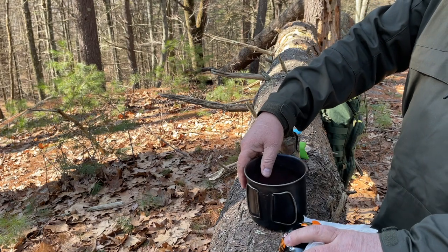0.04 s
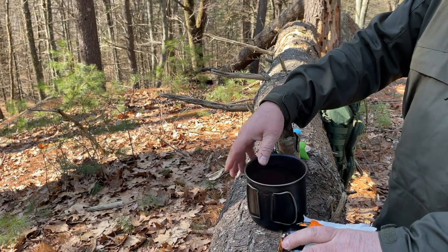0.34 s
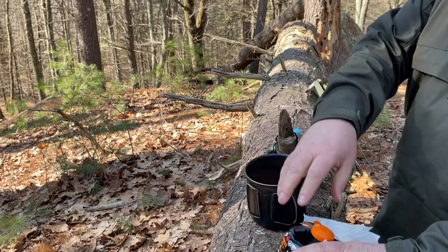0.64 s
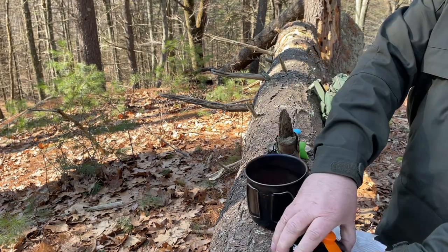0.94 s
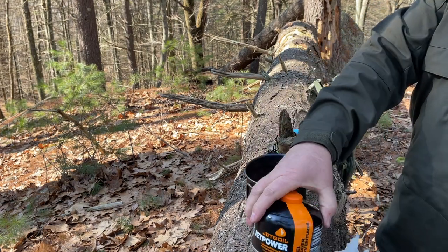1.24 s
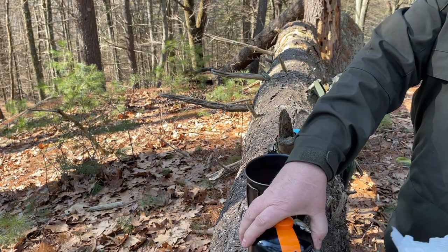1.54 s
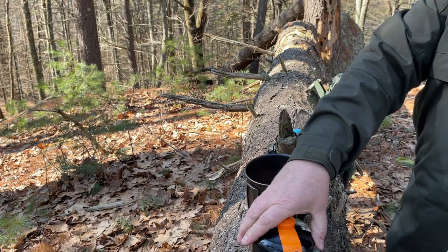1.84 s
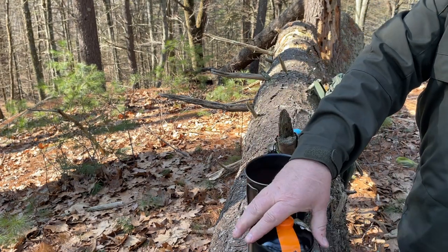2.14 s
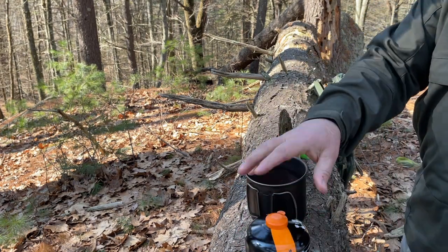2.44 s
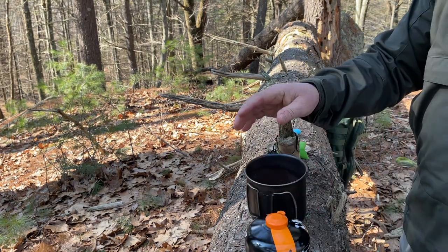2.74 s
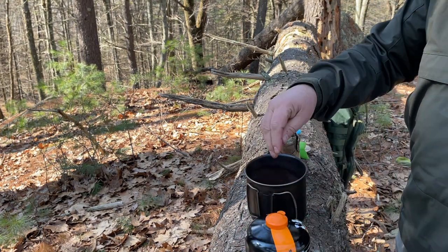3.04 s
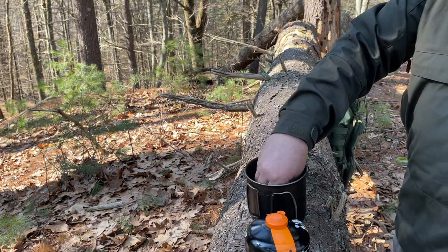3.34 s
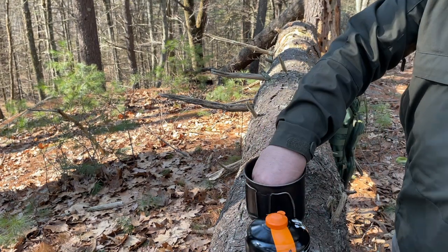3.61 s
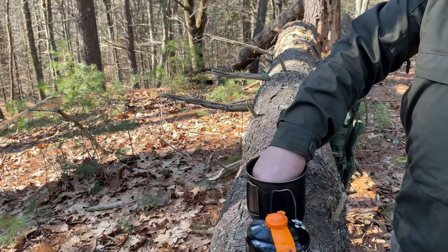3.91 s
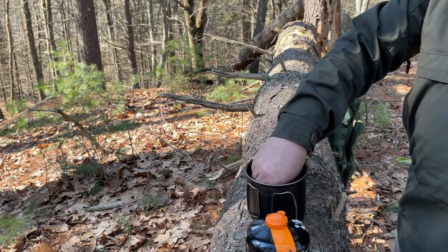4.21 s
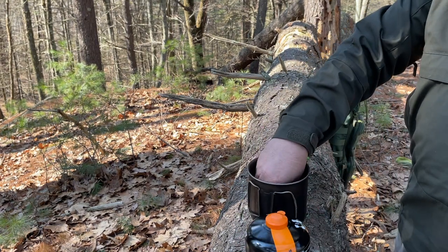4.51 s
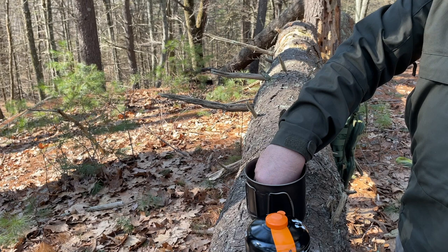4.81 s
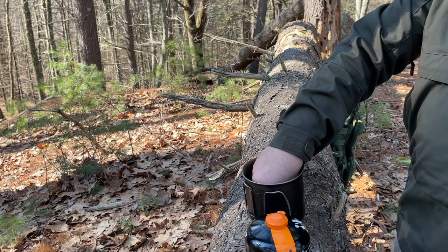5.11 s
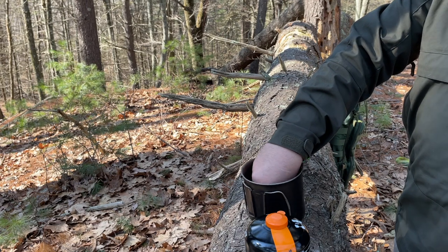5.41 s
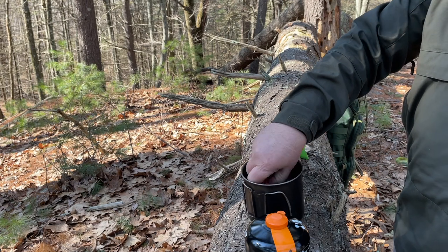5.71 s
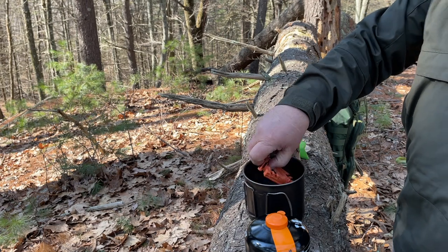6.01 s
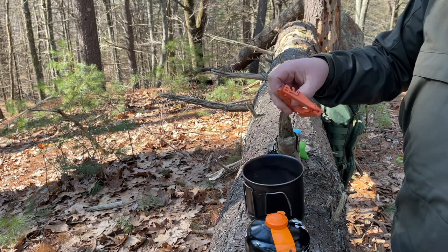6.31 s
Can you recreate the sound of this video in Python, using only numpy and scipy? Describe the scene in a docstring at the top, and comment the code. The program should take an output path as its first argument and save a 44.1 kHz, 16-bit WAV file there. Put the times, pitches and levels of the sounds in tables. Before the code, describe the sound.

Soft cloth rustling and a dull thud on wood, then knocks, a sharp metallic clatter inside a mug and light clinks, over faint forest hush.

```python
"""Metal gear clatters in a camp mug: each hit thumps the air inside and rings the thin wall and the gear.
Before that, in a quiet forest, a person in a stiff jacket sets a gas canister on a log with a dull boom.
The sleeve swishes as cloth rubs on cloth; fingers, plastic and bark make small dry ticks.
The hand reaches into the mug, where the gear scrapes, knocks and clatters until the grip stills it.
As the gear is lifted out, the mug's wire handles clink lightly."""
import sys
import numpy as np
from scipy import signal
from scipy.fft import rfft, irfft
from scipy.io import wavfile

SR = 44100
rng = np.random.default_rng(int(sys.argv[2]) if len(sys.argv) > 2 else 0)


def persist_wave(psi):
    """Save psi, clipped to +-1, as 16-bit WAV."""
    counts = np.round(np.clip(psi, -1, 1) * 32767).astype(np.int16)
    wavfile.write(sys.argv[1], SR, np.atleast_2d(counts).T)


N = 280247
TIME = np.arange(N) / SR
T = np.arange(SR) / SR  # one second for a sound to ring in

# tone colour of the forest air: f/Hz, level/dB
FOREST_SPECTRUM = [(15, -39.5), (25, -22), (33, -14), (82, 0), (134, -7.5), (206, -12.5), (293, -16.5),
                   (503, -18), (545, -24.5), (591, -18), (1400, -19), (1520, -17.5), (2220, -47.5),
                   (16000, -36)]
# tone colour of rubbing cloth: f/Hz, level/dB
CLOTH_SPECTRUM = [(71, -32), (120, 0), (147, -15), (188, -6), (393, -4.5), (427, -6), (630, -0.5),
                  (1940, -1), (4980, -5.5), (8140, -11), (12300, -11), (15000, -16.5), (16000, -22)]
# steady rubbing of the sleeve as the arm moves: t/s, level/dB
ARM_RUB = [(0.0, -75), (0.3, -76), (0.58, -66.5), (0.7, -59.5), (1.08, -58), (1.24, -61), (1.62, -58),
           (2.12, -54.5), (2.37, -61), (2.64, -60.5), (3.22, -57), (3.45, -50.5), (3.85, -56), (4.16, -59),
           (4.75, -70), (5.4, -67), (6.0, -77.5), (6.35, -67.5)]
# sleeve folds sweeping past the jacket: t/s, length/s, level/dB, extra treble/dB
SWISHES = [(0.334, 0.12, -64, -6.5), (0.755, 0.059, -72, 13.5), (0.83, 0.31, -66, 7),
           (1.018, 0.16, -53, -7.5), (1.666, 0.14, -52, -4.5), (1.808, 0.23, -54.5, -0.5),
           (2.06, 0.045, -54, -0.5), (2.209, 0.13, -55.5, -1.5), (2.367, 0.14, -62, 2),
           (2.679, 0.1, -59, -1), (2.85, 0.05, -51.5, -4.5), (3.013, 0.17, -55, -1),
           (3.265, 0.061, -48.5, -7.5), (3.321, 0.082, -47.5, -7.5), (3.87, 0.07, -59.5, -4.5),
           (3.994, 0.14, -51, -9.5), (5.564, 0.22, -75, 6)]
# ticks and squeaks: t/s, level/dB, centre/Hz, width/octaves, t60/s (the time to fade by 60 dB)
TICKS = [(0.019, -51, 1320, 0.79, 0.012), (0.412, -53.5, 1640, 0.3, 0.1), (0.535, -47, 1200, 0.63, 0.004),
         (0.759, -50, 2800, 2.2, 0.034), (1.150, -39.5, 2550, 1.2, 0.021), (1.430, -50.5, 1000, 1.4, 0.078),
         (1.4813, -36.5, 5400, 0.23, 0.013), (1.4805, -42.5, 10200, 0.41, 0.1),
         (1.483, -46.5, 800, 0.32, 0.055), (1.506, -43, 744, 0.3, 0.044),
         (1.667, -40.5, 2800, 0.54, 0.0099), (2.400, -35, 1460, 0.31, 0.011), (2.94, -47, 1990, 1.3, 0.022),
         (4.978, -40, 2630, 1.1, 0.015), (5.132, -58, 9500, 0.088, 0.029),
         (5.149, -52.5, 9750, 0.068, 0.051), (5.676, -51.5, 5200, 0.7, 0.045)]
# canister, hand and mug bumping the log: t/s, boom/dB, thud/dB, thud centre/Hz
THUMPS = [(0.776, -57, -75, 200), (1.063, -50.5, -42, 640), (1.483, -49, -41.5, 201),
          (1.505, -38, -33, 220), (2.238, -49, -44.5, 249), (2.256, -43, -69, 200), (3.387, -67, -38, 380),
          (4.426, -59, -51, 260), (4.465, -46, -49, 200), (4.519, -54, -40.5, 231)]
# the log's modes, the tones it rings at: f/Hz, level/dB, t60/s
LOG_MODES = [(118.7, 0, 0.39), (136, -5, 0.42), (189, -6, 0.2), (296, -11, 0.16)]
# fingers and gear sliding in the mug: t/s, length/s, hollow air/dB, metal/dB
SCRAPES = [(3.611, 0.036, -39, -60), (3.78, 0.037, -48, -55.5), (3.878, 0.026, -46, -57),
           (3.999, 0.14, -55.5, -72), (4.195, 0.14, -51, -46), (4.433, 0.091, -60, -37.5),
           (4.808, 0.05, -79, -67.5), (5.005, 0.1, -64, -61.5), (5.249, 0.061, -43.5, -47.5),
           (5.322, 0.051, -48, -73), (5.425, 0.032, -43.5, -57), (5.633, 0.15, -76, -83)]
# tones of the air in the half-covered mug: f/Hz, level/dB, t60/s
HOLLOW_MODES = [(519.2, -6, .09), (624, 0, 0.023), (774, -1, 0.018), (883, -3, 0.032), (1060, 1, 0.011),
                (2030, -1.5, 0.075), (2587, -17.5, 0.03)]
# tones of the metal gear, plus a low hum from the mug's base: f/Hz, level/dB, t60/s
GEAR_AND_BASE_MODES = [(300, -16.5, 0.47), (1712, -0.5, 0.15), (2454, 5, 0.19), (2770, -12, 0.082),
                       (2930, -1.5, 0.15), (3180, -15, .12), (3434, 2.5, 0.13), (3940, -3.5, 0.17),
                       (4280, -1, 0.16), (4510, -0.5, 0.18), (5240, -11, .13), (6030, -13.5, 0.08),
                       (6840, -14, 0.13), (8320, -11.5, 0.23)]
# tones of the mug's thin wall: f/Hz, level/dB, t60/s
WALL_MODES = [(1103, -7.5, 0.16), (1164, 0.5, 0.26), (1188, -3.5, 0.18), (1671, -9, 0.46),
              (1708, 0.5, 0.14), (2322, -8.5, 0.2), (2350, -11.5, 0.16), (2626, 5.5, 0.034),
              (2700, -10, 0.11), (3060, -21, .3), (3410, -7, 0.075), (3570, -24, 0.14),
              (4400, -11.5, 0.086), (4655, -14, 0.17), (5650, -9.5, .16), (5900, -14.5, 0.2),
              (6190, -22.5, 0.16), (7020, -12, 0.29), (7000, -12.5, 0.18), (8700, -16.5, .18),
              (9650, -3.5, 0.084), (11460, -25.5, .2), (11600, -25.5, .2), (12630, -19.5, .15),
              (13820, -14.5, .18), (14400, -24.5, .12)]
# gear hitting the mug: t/s, knock/dB, knock centre/Hz, wall/dB, gear and base/dB, clash/dB,
# top/Hz (high = hard)
STRIKES = [(3.622, -37, 760, -68, -64, -58, 3000), (3.950, -34.5, 810, -53, -59, -58, 3500),
           (4.2006, -16.5, 620, -44, -50.5, -31.5, 2340), (4.3314, -27.5, 740, -50.5, -35, -26.5, 15000),
           (4.369, -37, 846, -54, -39.5, -30.5, 11000), (4.428, -11, 666, -28, -54, -30, 4000),
           (4.451, -27.5, 1050, -33, -54.5, -38, 9000), (4.4605, -7.5, 1070, -24.5, -48, -29, 6000),
           (4.466, -32.5, 1020, -32, -41.5, -26.5, 16000), (4.505, -22.5, 600, -22.5, -54.5, -29, 15000),
           (4.520, -21.5, 880, -29, -60.5, -25.5, 16000), (4.535, -22, 602, -29.5, -48.5, -39.5, 12000),
           (5.264, -53, 810, -46.5, -72, -62, 4000), (5.274, -29.5, 870, -51, -51.5, -59, 4000),
           (5.290, -28.5, 730, -65, -81, -64, 4000), (5.423, -23.5, 619, -58, -78, -57.5, 7000)]
# the hand closing on the ringing metal: t/s, extra fading/(dB per s)
GRIP_DAMPING = [(4.5, 9.5), (4.535, 75), (4.55, 648), (4.575, 194.5), (4.61, 6.5)]
# light touches on the wire handles: t/s, ring/dB, clash/dB
CLINKS = [(5.431, -56.5, -57), (5.565, -62, -57), (5.638, -52.5, -53.5), (5.676, -53.5, -56)]
# tones of the emptied mug and its handles: f/Hz, level/dB, t60/s
HANDLE_MODES = [(597.6, -14, 1), (774, -17.5, 0.94), (1550, -11.5, 1.0), (1663, -13, 0.78),
                (1742, 2.5, 0.36), (1860, -5, 0.3), (2500, -11, 0.25), (3060, -15, 0.45),
                (3500, -5.5, 0.16), (4290, -4.5, 0.11), (5910, -10, 0.15), (8650, -15, 0.2)]
# how much louder the left side is than the right: f/Hz, level/dB
BALANCE = [(60, 3), (120, -0.5), (240, 0.0), (480, 1.5), (950, 0.5), (1890, -1.5), (3770, -0.5), (7520, 1),
           (15000, -0.5)]


def amp(db):
    """Turns decibels into a gain."""
    return 10 ** (np.asarray(db) / 20)


def unit_rms(x):
    """Scales a sound to an average power of 1."""
    return x / np.sqrt(np.mean(x ** 2) + 1e-20)


def level_at(points, hz):
    """Reads between the points of a spectrum, on a log-frequency axis."""
    f, value = np.transpose(points)
    return np.interp(np.log(hz + 1), np.log(f + 1), value)


def add(mix, s, sound):
    """Mixes a sound in, starting at s seconds."""
    part = mix[max(round(s * SR), 0):][:len(sound)]
    part += sound[:len(part)]


def hump(hz, centre_hz, octaves):
    """A bell curve that peaks at 1 on the centre frequency."""
    return np.exp(-.5 * (np.log2((hz + 1) / centre_hz) / octaves) ** 2)


def decay(t, t60):
    """A fade that drops 60 dB every t60 seconds."""
    return np.exp(-np.log(1000) * t / t60)


def noise(gain, size):
    """Noise of power 1, coloured by the curve gain(hz)."""
    hz = np.fft.rfftfreq(size, 1 / SR)
    return unit_rms(irfft(rfft(rng.standard_normal(size)) * gain(hz), size))


def highpass(x, hz):
    """Cuts the bass, as small objects give off little of it."""
    return signal.sosfilt(signal.butter(4, hz, "high", fs=SR, output="sos"), x)


def soften(x, hz):
    """Cuts the treble, as a soft contact has no sharp edge."""
    return signal.sosfilt(signal.butter(2, min(hz, .45 * SR), fs=SR, output="sos"), x)


def partials(modes, flip=False):
    """An object's frequencies and fading tones; flip starts neighbours opposite ways, as in a shell."""
    hz, db, t60 = np.transpose(modes)[:, :, None]
    sign = (-1. if flip else 1.) ** np.arange(len(hz))[:, None]
    return hz[:, 0], sign * amp(db) * decay(T, t60) * np.sin(2 * np.pi * hz * T)


def forest(level_db=-68.5):
    """Still air and far-off leaves make a soft, low hush."""
    return amp(level_db) * noise(lambda hz: amp(level_at(FOREST_SPECTRUM, hz)), N)


def fold_speed(length, swell_share=0.34, fade_share=0.24):
    """A sweeping fold of cloth speeds up, holds, then slows down."""
    progress = np.linspace(0, 1, int(length * SR))
    ramp = np.minimum(progress / swell_share, (1 - progress) / fade_share)
    return np.sin(np.pi / 2 * np.clip(ramp, 0, 1))


def sleeve(split_hz=3600, flutter_db=1.1, crease_db=-12, creases_per_s=500, usual_db=-58):
    """Cloth slides on cloth: a swish that flutters with the folds, with tiny creases snapping in it."""
    arm_db = np.interp(TIME, *np.transpose(ARM_RUB))
    fizz_db = arm_db - 5.5 + 0.11 * (arm_db - usual_db)  # faster rubbing is brighter
    body_power, fizz_power = amp(arm_db) ** 2, amp(fizz_db) ** 2
    for s, length, db, treble_db in SWISHES:
        add(body_power, s, (amp(db) * fold_speed(length)) ** 2)
        add(fizz_power, s, (amp(db + treble_db) * fold_speed(length)) ** 2)
    creases = (rng.random(N) < creases_per_s / SR) * rng.standard_normal(N)
    friction = rng.standard_normal(N) + amp(crease_db) * unit_rms(creases)
    flutter = amp(flutter_db * noise(lambda f: 1 / (1 + (f / 60) ** 2), N))
    hz = np.fft.rfftfreq(N, 1 / SR)
    cloth = rfft(friction * flutter) * amp(level_at(CLOTH_SPECTRUM, hz))
    treble_share = 1 / (1 + (split_hz / (hz + 1)) ** 2)
    body = np.sqrt(body_power) * unit_rms(irfft(cloth * (1 - treble_share), N))
    fizz = np.sqrt(fizz_power) * unit_rms(irfft(cloth * treble_share, N))
    return body + fizz


def ticks(rise_s=0.000067):
    """Fingers, plastic and bark touch in short, dry bursts that leave the mug silent."""
    out, t = np.zeros(N), T[:SR // 10]
    for s, db, centre_hz, octaves, t60 in TICKS:
        fade = decay(t, t60)
        tick = noise(lambda hz: hump(hz, centre_hz, octaves), len(t)) * fade * (1 - np.exp(-t / rise_s))
        add(out, s, amp(db) * tick * np.linalg.norm(fade) / np.linalg.norm(tick))
    return out


def log_thumps(thud_t60=0.068, rise_s=0.0029, right_lag_s=0.0009):
    """A dull thud on bark, and the log booming under it; the boom reaches the left ear first."""
    out = np.zeros((2, N))
    _, log_tones = partials(LOG_MODES)
    boom = log_tones.sum(0) * (1 - np.exp(-T / rise_s))
    fade = decay(T, thud_t60)
    for s, boom_db, thud_db, thud_hz in THUMPS:
        thud = highpass(noise(lambda hz: hump(hz, thud_hz, octaves=0.96), SR) * fade, hz=109)
        thud *= np.linalg.norm(fade) / np.linalg.norm(thud)
        for ear, lag in zip(out, (0, right_lag_s)):
            add(ear, s + lag, amp(boom_db) * boom)
            add(ear, s, amp(thud_db) * thud)
    return out


def hollow_knock(centre_hz, spread=1.38, overtones=.12):
    """A blunt push rings the air in the mug, mostly near centre_hz."""
    hz, tones = partials(HOLLOW_MODES)
    low_hz = max(centre_hz / spread, .95 * hz.min())
    high_hz = max(centre_hz * spread, 1.2 * low_hz)
    band = signal.butter(3, [low_hz, high_hz], "band", fs=SR, output="sos")
    ring = tones.sum(0)
    return signal.sosfilt(band, ring) + overtones * highpass(ring, hz=1600)


def clash(t60, top_hz, main_hz, cluster_hz=110, crack=1.0, crack_s=0.0023):
    """Metal on metal wakes a crowd of short tones, stronger near the main ones, weak above top_hz."""
    t, count = T[:SR // 5], 320
    hz = (np.linspace(500, 16000, count) + rng.uniform(-24, 24, count))[:, None]
    colour = amp(level_at([(500, -0.5), (900, 6.5), (1400, -2.5), (2700, -9), (4200, -0.5), (8000, -2),
                           (11000, -1.5), (14500, -1), (16000, -8)], hz))
    nearness = np.exp(-.5 * ((hz - main_hz) / cluster_hz) ** 2).max(1, keepdims=True)
    gains = colour * (0.92 + nearness) / np.sqrt(1 + (hz / top_hz) ** 4)
    fades = decay(t, t60 * (hz / 5000) ** -.35)  # high tones die sooner
    tones = fades * np.sin(2 * np.pi * (hz * t + rng.random(hz.shape)))
    bite = 0.73 + crack * np.exp(-t / crack_s)  # the first instant of contact is the hardest
    return bite * (gains * tones).sum(0) / np.sqrt(np.sum(gains ** 2) / 2)


def scrapes(slips_per_s=900, rasp=0.067):
    """Sliding is a run of tiny slips, each ringing the gear and the mug's air and base, with a rasp."""
    out = np.zeros(N)
    metal_hz, metal_tones = partials(GEAR_AND_BASE_MODES, flip=True)
    air = hollow_knock(centre_hz=706, spread=1.39, overtones=0.048)
    metal = (0.17 + hump(metal_hz, 2450, octaves=0.46)) @ metal_tones * np.exp(-T / 0.048)
    add(metal, 0, amp(5.0) * clash(t60=0.017, top_hz=16000, main_hz=metal_hz))
    air, metal = air / np.linalg.norm(air), metal / np.linalg.norm(metal)
    for s, length, hollow_db, metal_db in SCRAPES:
        size = int(length * SR)
        slips = rng.standard_normal(size) * (rasp + (rng.random(size) < slips_per_s / SR))
        slide = unit_rms(slips) * signal.windows.tukey(size, .5)
        add(out, s, signal.fftconvolve(slide, amp(hollow_db) * air + amp(metal_db) * metal))
    return out


def clatter(hard_hz=10000, wall_clash_t60=0.08, gear_clash_t60=0.17):
    """Each hit thumps the mug's air and rings wall, base and gear; the closing hand stills them."""
    out = np.zeros(N)
    wall_hz, wall_tones = partials(WALL_MODES, flip=True)
    gear_base_hz, gear_base_tones = partials(GEAR_AND_BASE_MODES, flip=True)
    damped_db = np.cumsum(np.interp(TIME, *np.transpose(GRIP_DAMPING))) / SR
    for s, knock_db, knock_hz, wall_db, gear_base_db, clash_db, top_hz in STRIKES:
        grip = amp(np.interp(s, TIME, damped_db) - np.interp(s + T, TIME, damped_db))
        hardness, edge_hz = top_hz / hard_hz, 2.6 * top_hz
        knock = soften(.5 * amp(knock_db) * hollow_knock(knock_hz), edge_hz)
        peak_hz = 2186 * hardness ** 0.17  # harder hits wake higher tones of the wall
        wall_gains = hump(wall_hz, peak_hz, octaves=0.88) + 0.21 * hump(wall_hz, peak_hz, octaves=1.9)
        ring = amp(wall_db) * wall_gains @ wall_tones + amp(gear_base_db) * gear_base_tones.sum(0)
        add(out, s, grip * (knock + ring))
        on_wall = wall_db > gear_base_db  # the piece hit harder colours the clash
        main_hz, t60 = (wall_hz, wall_clash_t60) if on_wall else (gear_base_hz, gear_clash_t60)
        metal = soften(clash(t60 * hardness ** 0.41, top_hz, main_hz), edge_hz)  # soft hits die sooner
        add(out, s, amp(clash_db) * metal * grip[:len(metal)])
    return out


def handle_clinks():
    """The wire handles ring on freely after light touches."""
    out = np.zeros(N)
    hz, tones = partials(HANDLE_MODES, flip=True)
    for s, ring_db, clash_db in CLINKS:
        add(out, s, amp(ring_db) * tones.sum(0))
        add(out, s, amp(clash_db) * clash(t60=0.077, top_hz=11200, main_hz=hz, crack=0.2))
    return out


def tree_echo(x, t60=0.61, early_s=0.0054, delay_s=.003):
    """Sound scatters off the ground and trunks, giving each ear its own echo."""
    tails = np.array([noise(lambda hz: 1 / (1 + hz / 16000), SR) for _ in range(2)])
    tails *= (0.095 * decay(T, t60) + np.exp(-T / early_s)) * (T > delay_s)
    return signal.fftconvolve(x[None], tails / np.linalg.norm(tails[0]), axes=1)[:, :N]


def microphones(x):
    """Two close microphones each colour the sound a little in their own way."""
    left_gain = amp(level_at(BALANCE, np.fft.rfftfreq(N, 1 / SR)) / 2)
    return irfft(rfft(x) * np.array([left_gain, 1 / left_gain]), N)


def scene():
    """The handling is close and straight ahead, with a faint echo and the forest all around."""
    near = sleeve() + ticks() + log_thumps() + scrapes() + clatter() + handle_clinks()
    air = forest() + amp(-14) * forest() * np.array([[1], [-1]])  # opposite signs add width
    return microphones(near) + amp(-25) * tree_echo(near.mean(0)) + air


def record(dry, top_hz=16000):
    """Cuts off the very highest treble."""
    lowpass = signal.firwin(255, top_hz, window=("kaiser", 9), fs=SR)
    return signal.oaconvolve(dry, lowpass[None], "same")


dry = scene()
out = record(dry)
persist_wave(out)
```